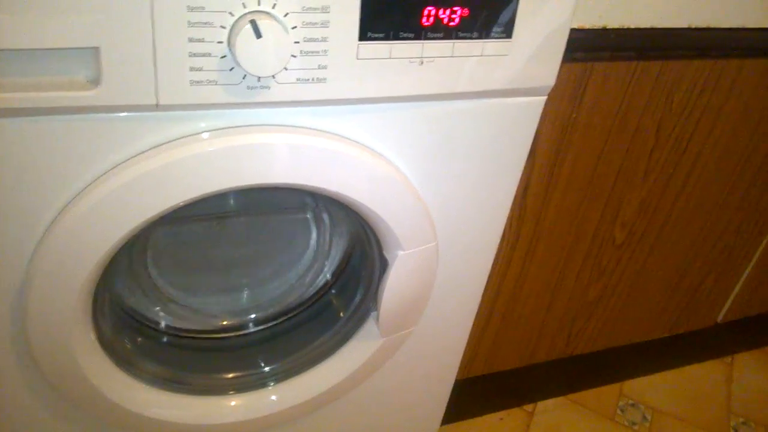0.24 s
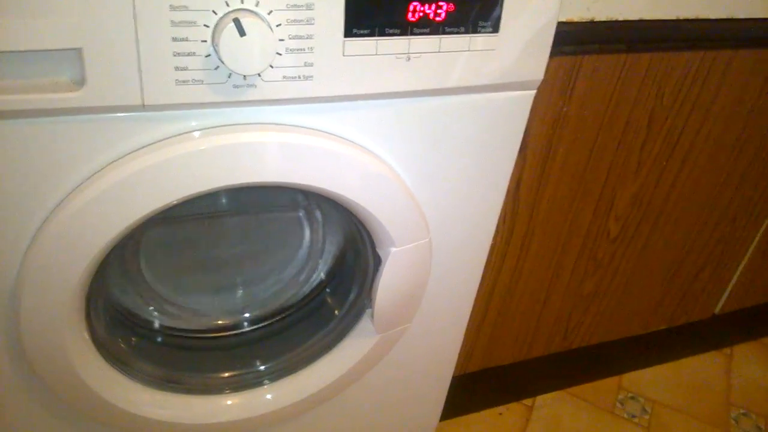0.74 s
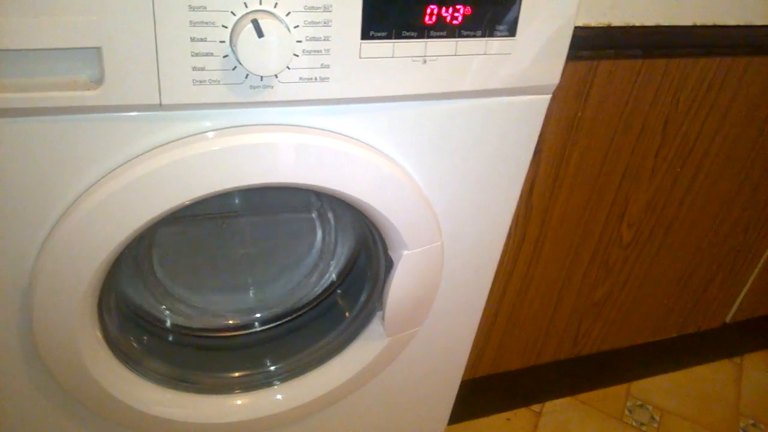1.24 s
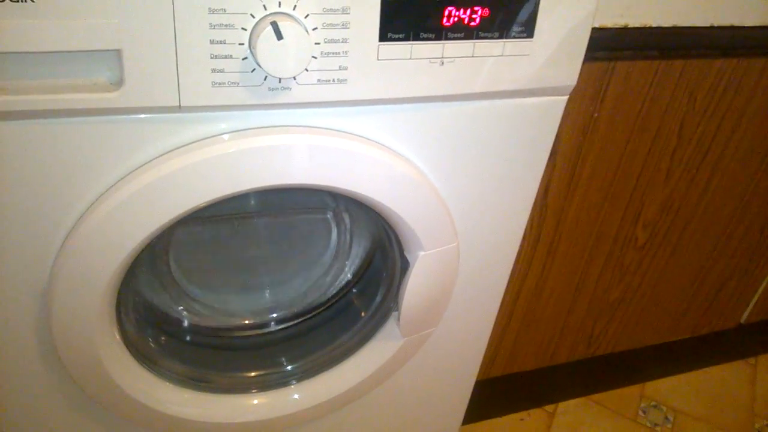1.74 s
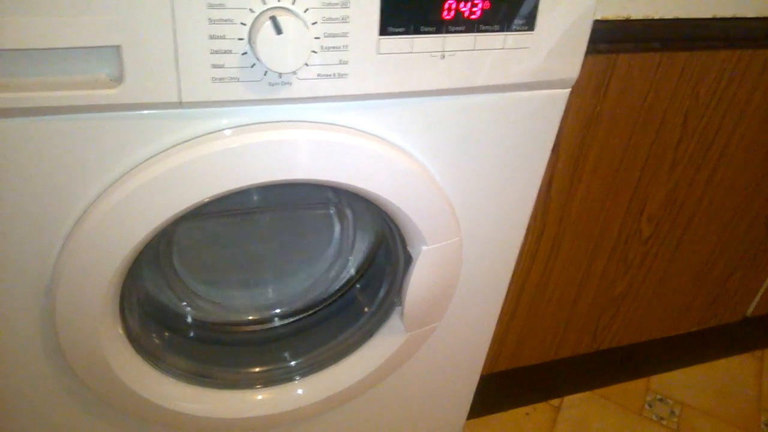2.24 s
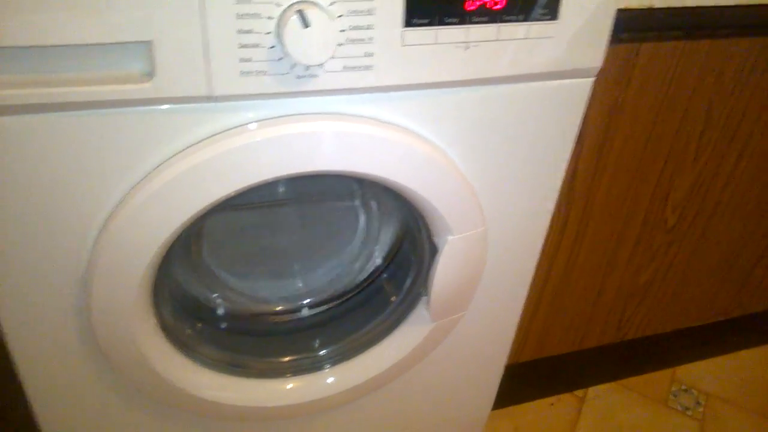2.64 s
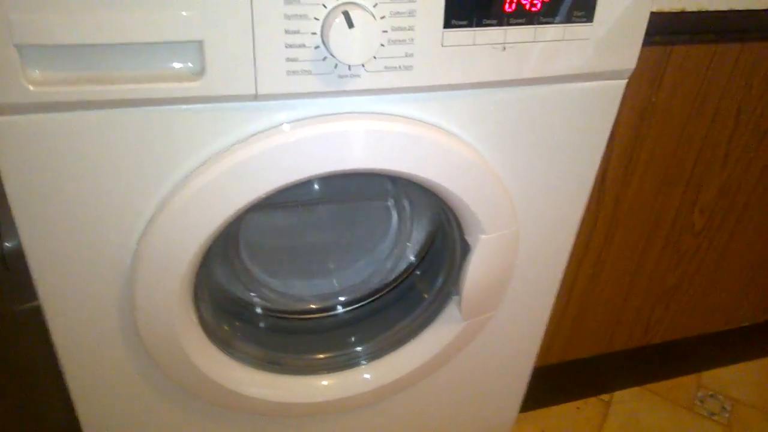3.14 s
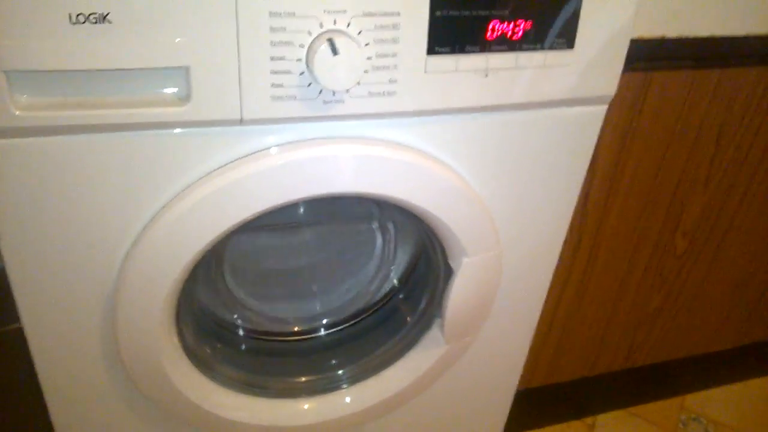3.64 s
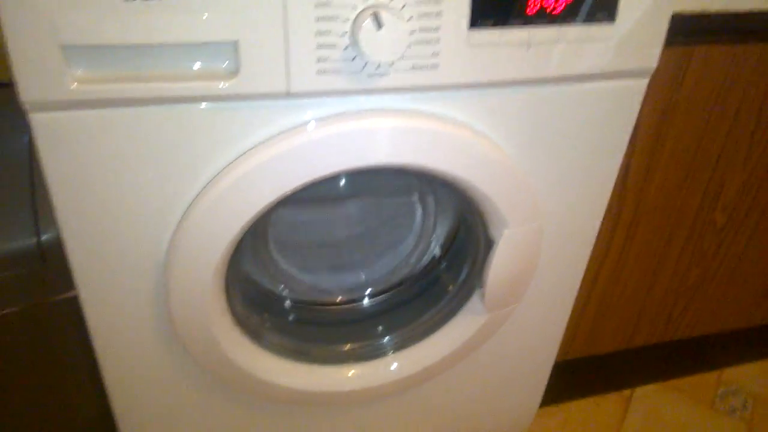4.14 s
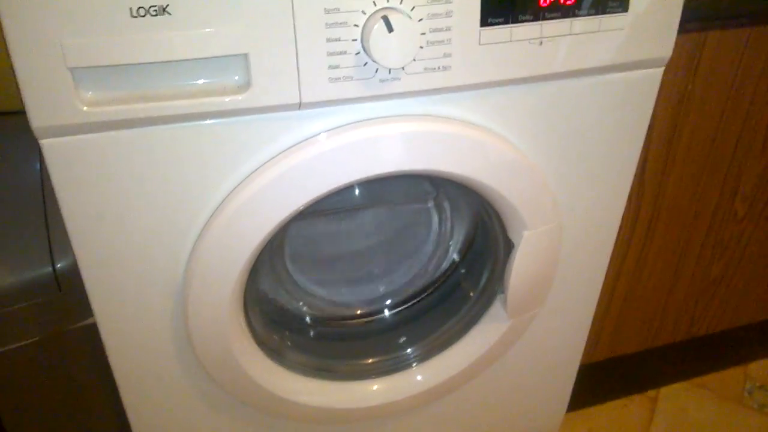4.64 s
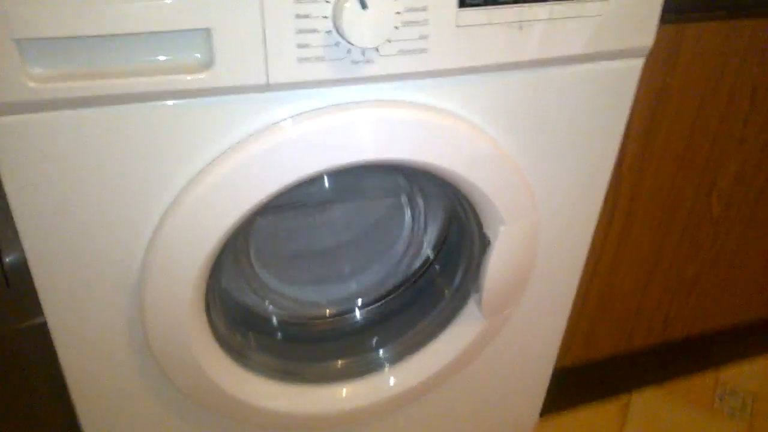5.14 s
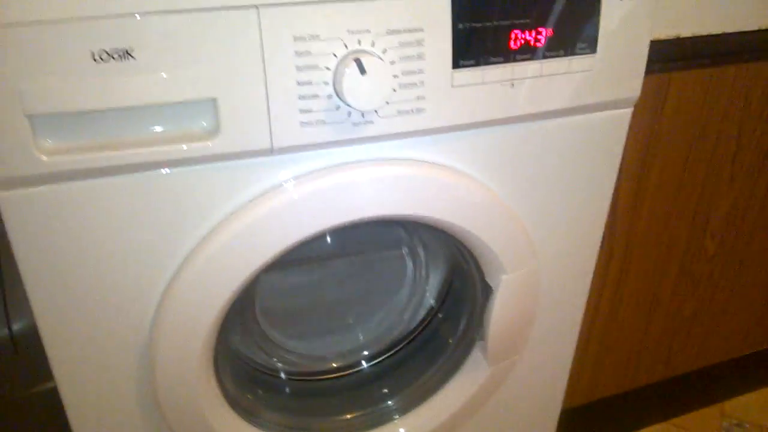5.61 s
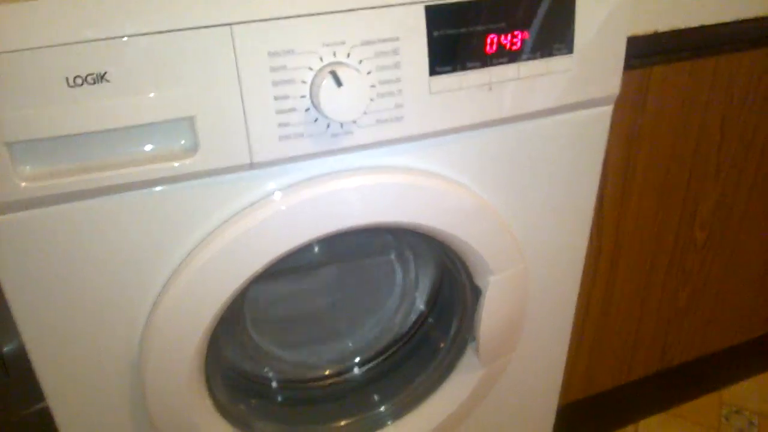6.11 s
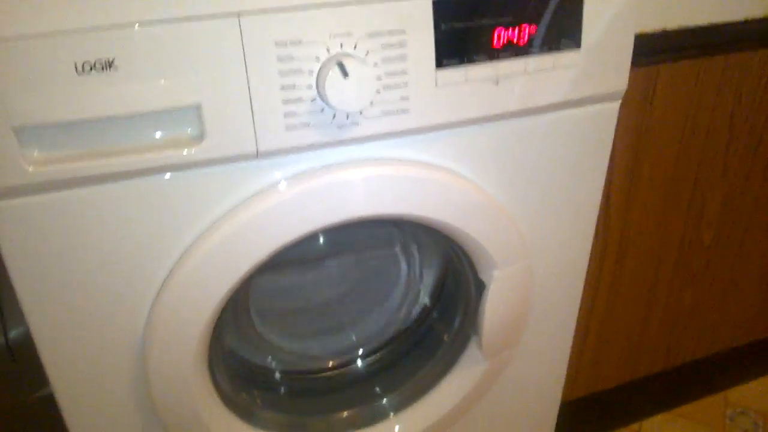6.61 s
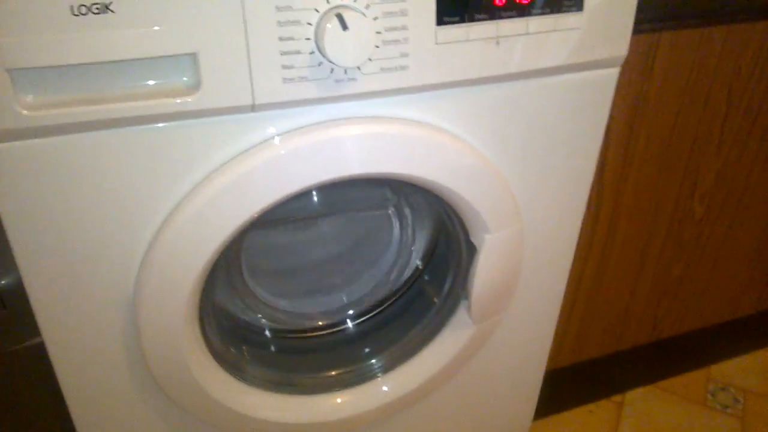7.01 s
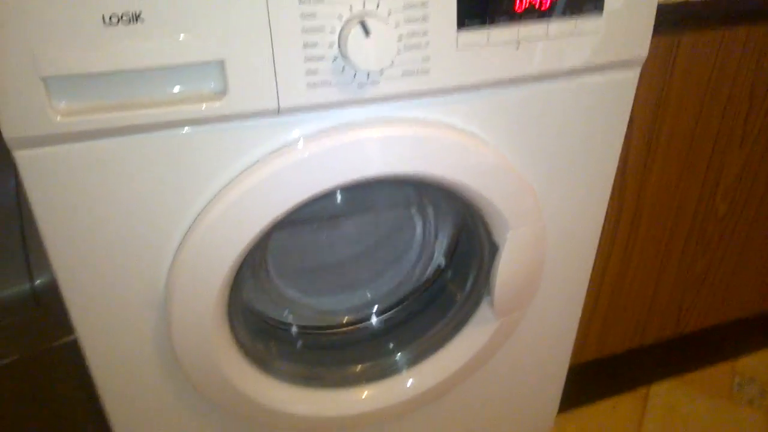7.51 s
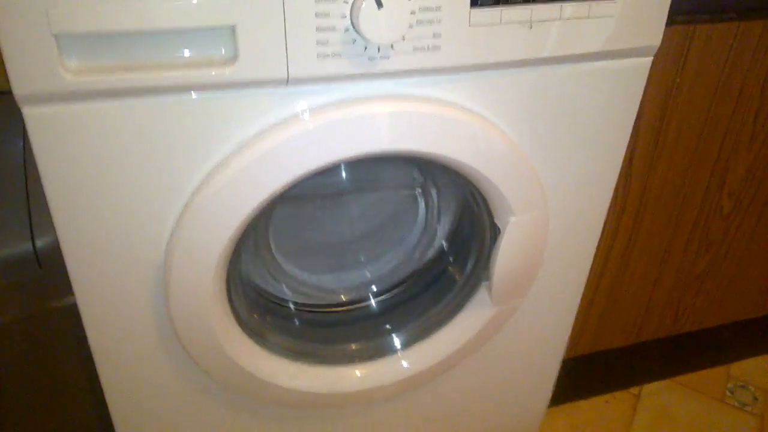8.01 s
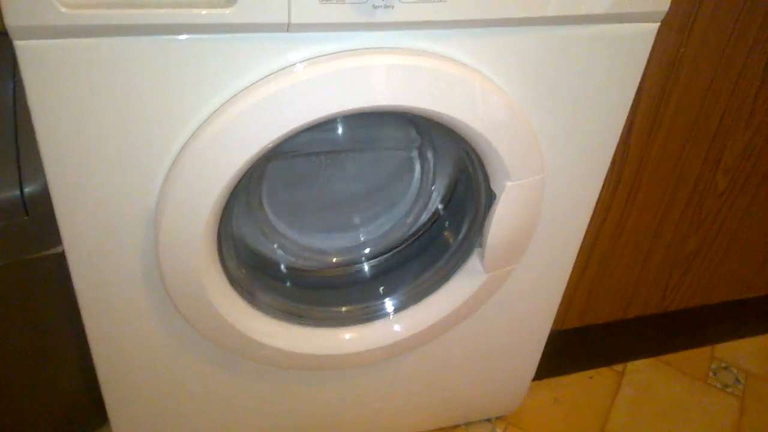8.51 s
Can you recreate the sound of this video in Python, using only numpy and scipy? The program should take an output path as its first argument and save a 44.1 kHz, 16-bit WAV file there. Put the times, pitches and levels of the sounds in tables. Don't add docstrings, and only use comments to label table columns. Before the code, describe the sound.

A front-loading washing machine spins steadily in a small, reflective kitchen, heard close from a drifting hand-held microphone. A low throbbing drum hum and cabinet rumble sit under a piercing, fluttering motor whine with bright overtones and airy hiss. The main whine weakens early, then grows stronger. A brief brush crackle comes past the middle, and near the end water trickles and surges into the drain hose.

```python
import sys
import numpy as np
from scipy import signal
from scipy.fft import rfft, irfft, next_fast_len
from scipy.io import wavfile
from scipy.ndimage import uniform_filter1d, map_coordinates

SR = 44100
rng = np.random.default_rng(int(sys.argv[2]) if len(sys.argv) > 2 else 0)


def gain_from_db(level_db):
    decades = np.asarray(level_db, float) / 20
    return 10 ** decades


def unload_audio(sound):
    columns = np.transpose(np.atleast_2d(sound))
    steps = np.round(np.clip(columns, -1, 1) * 32767)
    wavfile.write(sys.argv[1], SR, steps.astype(np.int16))


N = 386316
TIME = np.arange(N) / SR
DRUM_HZ, BELT_HZ, SHAFT_HZ, MAINS_HZ = 10.1322, 7.5, 116.49, 50
SLOTS = 18


def unit(x):
    return x / np.sqrt(np.mean(x ** 2) + 1e-20)


def along(points, hz):
    f, v = np.transpose(points)
    return np.interp(np.log(hz + 1), np.log(f + 1), v)


def curves(rows):
    s, *cols = np.transpose(rows)
    return [np.interp(TIME, s, c) for c in cols]


def wobble(rate):
    coarse = TIME[::32]
    knots = rng.standard_normal(int(N * rate / SR) + 4)
    return np.interp(TIME, coarse, map_coordinates(knots, [coarse * rate]))


def noise(spectrum):
    m = next_fast_len(N)
    gain = gain_from_db(along(spectrum, np.fft.rfftfreq(m, 1 / SR))) * np.sqrt(SR / 2)
    return irfft(rfft(rng.standard_normal(m)) * gain, m)[:N]


def one_turn(multiples, db, turns, angle):
    lines = np.zeros(8193, complex)
    lines[np.asarray(multiples, int)] = gain_from_db(db) * np.exp(2j * np.pi * turns) * 8192 * np.sqrt(2)
    table = irfft(lines)
    return np.interp(angle % 1 * len(table), np.arange(len(table) + 1), np.append(table, table[0]))


def kitchen(x, wet_db, t60=0.57, hold=0.7045):
    hop, t = int(hold * SR), np.arange(SR // 4) / SR
    padded = np.pad(x, (hop, 2 * hop))
    fade = np.sqrt(np.hanning(2 * hop))
    out = np.zeros(N + 3 * SR)
    for start in range(-hop, N, hop):
        tail = rng.standard_normal(len(t)) * gain_from_db(-60 * t / t60)
        tail *= gain_from_db(wet_db) / np.linalg.norm(tail)
        tail[0] += 1
        part = signal.fftconvolve(padded[start + hop:][:2 * hop] * fade, tail)
        out[start + hop:][:len(part)] += part
    return out[hop:hop + N]


def steady(x, span=0.4):
    width = int(span * SR)
    power = uniform_filter1d(uniform_filter1d(x ** 2, width), width)
    return x / np.sqrt(np.abs(power) + 1e-20)


# (multiple of the drum rate, level [dB rms])
DRUM_LINES = [(2, -53), (3, -60), (4, -58.5), (5, -60.5), (6, -61.0), (7, -44), (8, -74), (9, -60),
              (10, -77), (11, -52), (12, -52.5), (13, -35.5), (14, -50), (15, -47), (16, -57.5), (17, -75),
              (18, -71), (19, -47), (20, -54), (21, -59.5), (23, -63), (24, -61.5), (25, -55), (27, -58),
              (29, -61), (31, -58), (34, -66), (35, -63)]


def drum():
    k, db = np.transpose(DRUM_LINES)
    loose = np.clip((-53 - db) / 6, 0, 1) * rng.uniform(-.5, .5, 40)[k.astype(int)]
    turns = np.where((k > 15) | (k == 12), .105 * (k - 23) - .08, .47 + loose)
    turns[(k % 6 == 1) & (k < 20)] = .05
    return gain_from_db(.45 * wobble(4)) * one_turn(k, db, turns, DRUM_HZ * TIME)


# (frequency [Hz], level [dB rms])
HUM_LINES = [(180.0, -67), (190.0, -68), (200.0, -60), (300.0, -61.5), (320.25, -57.5), (364.75, -62),
             (395.25, -68.5), (449.5, -59.5), (476.25, -65), (516.75, -71.5), (549.5, -67), (719.75, -58.5),
             (722.5, -76), (732.5, -65), (739.75, -68), (749.75, -62), (774.75, -64.5), (779.75, -64),
             (787.25, -63.5), (794.75, -68), (837.25, -60.5), (879.5, -62), (942.0, -66), (952.25, -64.5),
             (984.25, -68), (994.5, -68.5), (1004.5, -69.5), (1079.5, -70.5), (1099.0, -65), (1281.25, -74)]
# (frequency [Hz], level [dB per Hz])
RUMBLE_SPECTRUM = [(20, -77), (85, -72), (135, -68), (230, -69), (400, -74.5), (650, -79.5), (710, -77),
                   (850, -77), (1000, -78.5), (1250, -84), (1600, -91.5), (2200, -100)]
TURN_AWAY_S, PANEL_DB, PANEL_FADE_DB_PER_S = 4.5, 0.26, 0.58


def cabinet():
    t = TIME[::8]
    lines = 0
    for hz, db in HUM_LINES:
        swell = gain_from_db(db + 3 + 3.2 * wobble(6)[::8])
        lines = lines + swell * np.sin(2 * np.pi * hz * t + 0.97 * wobble(6)[::8])
    lines = signal.resample_poly(lines, 8, 1)[:N]
    low = [p for p in RUMBLE_SPECTRUM if p[0] < 300] + [(330, -120)]
    high = [(250, -120)] + [p for p in RUMBLE_SPECTRUM if p[0] > 300]
    panels = lines + gain_from_db(0.8 * wobble(8)) * noise(high)
    fade = gain_from_db(PANEL_DB - PANEL_FADE_DB_PER_S * np.maximum(TIME - TURN_AWAY_S, 0))
    return gain_from_db(.8 * wobble(5.4)) * noise(low) + fade * panels


# (time [s], level [dB rms])
SLOT_LEVEL = [(0, -44.5), (1.15, -63.5), (1.6, -55.5), (2.15, -55), (2.5, -72), (2.75, -49), (3.25, -41),
              (3.75, -44), (4.35, -38.5), (4.9, -39), (5.3, -37), (6.1, -39.5), (6.4, -42.5), (6.75, -38.5),
              (7.3, -40.5), (7.5, -37.5), (8.76, -35)]
OPEN_DB, DEAD_DB = -39, -56


def shade_db():
    return np.maximum(curves(SLOT_LEVEL)[0], DEAD_DB) - OPEN_DB


# (belt multiple, upper level [dB], lower level [dB], opposed wall echo of the lower [dB])
BELT_SIDE_LINES = [(1, 2.5, -7, -35), (2, -1.5, -4, -12), (3, -6.5, -13, -11), (4, -24, -30, -19)]
# (drum multiple, upper level [dB], lower level [dB])
DRUM_SIDE_LINES = [(1, -5, -7), (2, -10, -15), (3, -22, -19), (4, -24, -24)]
# (offset [Hz], upper level [dB], lower level [dB])
OTHER_SIDE_LINES = [(MAINS_HZ, -22, -14), (2 * MAINS_HZ, -12, -8), (90, -26, -16), (4 * MAINS_HZ, -22, -40)]
SIDES_DB = -53
SIDES_FOLLOW, LOWER_FOLLOW, MAINS_FOLLOW = .48, .3, .25
UPPER_LEAN, LEAN_PER_DB, LOWER_LEAN, DRUM_LEAN = -.035, .011, .2, -.05
JOINT_S, LOAD_S = 6.014, 5.217


def phasor(db, turns):
    return gain_from_db(db) * np.exp(2j * np.pi * turns)


def slot_tone(slow):
    t, shade = TIME[::8], shade_db()[::8]
    belt, swing = BELT_HZ * (t - JOINT_S), DRUM_HZ * (t - LOAD_S)
    moving, echo, mains = 0, 0, 0
    for k, up, down, echo_db in BELT_SIDE_LINES:
        moving = moving + phasor(up + 0.9 * wobble(2)[::8], k * belt + UPPER_LEAN + LEAN_PER_DB * shade)
        moving = moving + phasor(down + LOWER_FOLLOW * shade + 1.2 * wobble(2)[::8], LOWER_LEAN - k * belt)
        echo = echo + phasor(echo_db, LOWER_LEAN - k * belt)
    for k, up, down in DRUM_SIDE_LINES:
        for db, way in ((up, 1), (down, -1)):
            moving = moving + phasor(db + 1.2 * wobble(3.06)[::8], DRUM_LEAN + way * k * swing)
    for hz, up, down in OTHER_SIDE_LINES:
        for db, way in ((up, 1), (down, -1)):
            mains = mains + phasor(db, way * hz * t + .15 * wobble(1)[::8])
    sides = gain_from_db(MAINS_FOLLOW * shade) * mains + echo - gain_from_db(SIDES_FOLLOW * shade) * moving
    envelope = gain_from_db(curves(SLOT_LEVEL)[0]) + gain_from_db(SIDES_DB) * np.interp(TIME, t, sides)
    return np.sqrt(2) * np.real(envelope * phasor(0, SLOTS * slow))


def line_levels(levels, spots):
    shade = shade_db()
    for (db, follow, *_), marks in zip(levels, spots):
        swells = sum(gain_db * np.exp(-((TIME - s) / length) ** 2) for s, length, gain_db in marks)
        yield db + follow * shade + swells


def overtone(order, slow, angle, level_db, row):
    open_db, _, core_db, grows = row
    core, tone = np.exp(2j * np.pi * order * slow), np.exp(2j * np.pi * order * angle)
    flutter = np.real(tone - np.mean(tone * core.conj()) * core)
    flutter = steady(kitchen(flutter, wet_db=6))
    core_gain = gain_from_db(core_db + grows * (level_db - open_db)) * np.sqrt(2)
    core_tone = np.real(core * np.exp(2j * np.pi * rng.random()))
    return gain_from_db(level_db) * steady(flutter + core_gain * core_tone)


# (level in the open [dB rms], follow [dB per dB of slot tone],
# steady core over flutter [dB], core growth [dB per dB of level])
OVERTONE_ROWS = [(-42, 0.37, 1.5, 1.5), (-43, 0, -1.5, 0.6), (-40.5, .14, -9, 2), (-42.5, 0, -8.5, 1.8),
                 (-53, 0, -7, 0), (-55.5, 0, -8, 0)]
# (time [s], length [s], level [dB])
OVERTONE_ROOM_SPOTS = [
    [(0, 0.32, -4.5), (.9, 0.86, 5), (3.6, 0.7, -3.5), (4.9, .5, 1.5), (6.05, 0.21, -4.5), (7.2, .6, -1.5),
     (8.4, 0.39, 2.5)],
    [(4.4, .4, -3), (5.45, 0.23, 2), (8.5, 0.33, 5)],
    [(.75, .3, 2.5), (5.1, 0.32, 3.5), (6.6, .5, 2.5), (8.5, .4, 2.5)],
    [(3.7, 0.26, 3), (4.75, .25, 2.5), (6.3, .4, 4), (8.2, 0.38, -1.5)],
    [],
    [],
]


def whine(slow, angle):
    total = 0
    for k, db in enumerate(line_levels(OVERTONE_ROWS, OVERTONE_ROOM_SPOTS)):
        shake = gain_from_db(0.92 * np.sin(2 * np.pi * (DRUM_HZ * TIME + rng.random())))
        total = total + shake * overtone(SLOTS * (k + 2), slow, angle, db, OVERTONE_ROWS[k])
    return total


CLEAR_ORDERS = (20, 25, 28, 32)
# (level in the open [dB rms], follow [dB per dB of slot tone])
CLEAR_LEVELS = [(-65.5, 0), (-70, -0.66), (-67, 0), (-63, -0.34)]
# (time [s], length [s], level [dB])
CLEAR_ROOM_SPOTS = [
    [(3.2, 1, 5), (8.6, .5, 2)],
    [(3.5, 0.62, 5), (5.5, 0.39, 8), (8.7, 0.36, 10)],
    [(2.4, .5, 6), (5.7, 0.55, 9), (7.7, .5, 9)],
    [(0, 0.39, 6), (4.95, .25, 5), (7, 0.65, 3)],
]


def clear_orders(angle):
    total = 0
    for k, db in zip(CLEAR_ORDERS, line_levels(CLEAR_LEVELS, CLEAR_ROOM_SPOTS)):
        total = total + gain_from_db(db + 4.0 + 2.0 * wobble(14)) * np.sin(2 * np.pi * k * angle)
    return total


# (multiple, level [dB rms])
LOW_ORDERS = [(17, -65), (19, -67), (26, -77), (27, -70.5), (29, -62), (30, -70.5), (31, -68.5),
              (33, -67.5), (34, -67.5), (35, -68), (37, -62.5), (38, -60), (39, -74), (40, -59.5),
              (41, -66.5), (42, -72), (43, -59.5), (44, -79), (45, -80), (46, -61.5), (47, -56.5),
              (48, -69), (49, -79), (50, -65), (51, -60), (52, -65), (53, -63)]
# (frequency [Hz], level [dB rms per order])
HIGH_ORDERS = [(5500, -65), (7000, -61), (8500, -62), (10000, -61), (11500, -66), (13000, -78),
               (15500, -76)]
# (orders above an overtone, level [dB])
BRUSH_ORDERS = [(1, 0), (2, 3.5), (3, 3.5), (4, 1.5), (5, -10), (6, 2.5), (7, 4), (8, -20), (9, -11),
                (10, -3), (11, 4.5), (12, -14.5), (13, -4), (14, 4.5), (15, -7), (16, 4.5), (17, 5.5)]


def brush_rub(angle):
    high = np.array([k for k in range(55, 134) if k % SLOTS])
    bars_db = np.transpose(BRUSH_ORDERS)[1][high % SLOTS - 1]
    high_db = along(HIGH_ORDERS, high * SHAFT_HZ) + bars_db + 1.2 * rng.standard_normal(len(high))
    low, low_db = np.transpose(LOW_ORDERS)
    k, db = np.append(low, high), np.append(low_db, high_db)
    return kitchen(one_turn(k, db - 6.2, rng.random(len(k)), angle), wet_db=6, hold=.3)


# (time [s], slot tone shift [Hz])
PITCH_DRIFT = [
    (0.0, 1.94),
    (1.21, 0.26),
    (2.29, 0.028),
    (4.29, -0.19),
    (4.49, -0.19),
    (4.89, -0.45),
    (5.85, -0.27),
    (6.01, -0.057),
    (8.53, 1.5),
    (8.75, 2.3),
]
# (rate [Hz], shaft angle [rad])
SHAFT_RIPPLE = [(BELT_HZ, 0.011), (2 * BELT_HZ, 0.0096), (3 * BELT_HZ, 0.0068), (DRUM_HZ, 0.018),
                (2 * DRUM_HZ, 0.013), (3 * DRUM_HZ, 0.0049), (4 * DRUM_HZ, 0.0027), (MAINS_HZ, 0.0024),
                (2 * MAINS_HZ, 0.0021)]


def motor():
    slow = SHAFT_HZ * TIME + np.cumsum(curves(PITCH_DRIFT)[0]) / SR / SLOTS
    ripple = 0.0046 * wobble(30)
    for hz, size in SHAFT_RIPPLE:
        ripple = ripple + size * np.sin(2 * np.pi * (hz * TIME + rng.random()) + 0.21 * wobble(0.99))
    angle = slow + ripple / (2 * np.pi)
    return slot_tone(slow) + whine(slow, angle) + clear_orders(angle) + brush_rub(angle)


# (frequency [Hz], level [dB per Hz])
AIR_SPECTRUM = [(1200, -110), (1900, -84.5), (2300, -90.5), (2700, -92), (3600, -91.5), (4700, -89),
                (6500, -85), (8700, -83.5), (10500, -87), (13000, -89.5), (15500, -110.5)]


def airflow():
    pulse_db = 1.3 * np.sin(2 * np.pi * DRUM_HZ * TIME)
    return gain_from_db(0.78 * wobble(9) + pulse_db) * noise(AIR_SPECTRUM)


# (time [s], peak level [dB])
CRACKLES = [
    (5.228, -35),
    (5.234, -33),
    (5.240, -28),
    (5.246, -24.5),
    (5.2495, -26),
]


def sparks():
    shape = sum(gain_from_db(db - 60 * np.abs(TIME - s) / 0.0038) for s, db in CRACKLES)
    return shape * unit(noise([(600, -22), (2500, -12), (5500, -10), (7500, 2), (9500, -6), (12000, -28)]))


# (frequency [Hz], level [dB])
GURGLE_SPECTRUM = [(60, -20), (200, 4), (350, 3), (600, 1), (1000, 0.5), (1500, -5.5), (2500, -11),
                   (4000, -30)]
# (frequency [Hz], level [dB])
SURGE_SPECTRUM = [(700, -25), (1200, 2), (1900, -2), (3000, -22)]
TRICKLE_S, TRICKLE_DB, VALVE_S, VALVE_OPENS_S = 7.9, -62, 8.082, 0.018
FLOW_DB, FLOW_GROWS_DB_PER_S, FLOW_RISE_S = -48, 7, .15
SURGE_DB, SURGE_S, SURGE_FADE_S = -47.5, 0.074, .03


def drain():
    after = TIME - VALVE_S
    trickle = gain_from_db(TRICKLE_DB) * (TIME > TRICKLE_S)
    rush = gain_from_db(FLOW_DB + FLOW_GROWS_DB_PER_S * after) * np.clip(after / FLOW_RISE_S, 0, 1)
    surge_shape = np.minimum(after / VALVE_OPENS_S, 1 - (after - SURGE_S) / SURGE_FADE_S)
    surge = gain_from_db(SURGE_DB) * np.clip(surge_shape, 0, 1)
    water = (trickle + rush) * unit(noise(GURGLE_SPECTRUM))
    return gain_from_db(0.92 * wobble(30)) * (water + surge * unit(noise(SURGE_SPECTRUM)))


def scene():
    return (drum() + cabinet() + motor() + airflow() + sparks() + drain())[None]


def low_pass(x):
    return signal.sosfilt(signal.butter(12, 16400, fs=SR, output="sos"), x)


def record(dry):
    m = next_fast_len(N)
    kept = np.fft.rfftfreq(m, 1 / SR) < 15720
    mix = irfft(rfft(dry, m) * kept, m)[:, :N]
    return low_pass(mix)


dry = scene()
out = record(dry)
unload_audio(out)
```